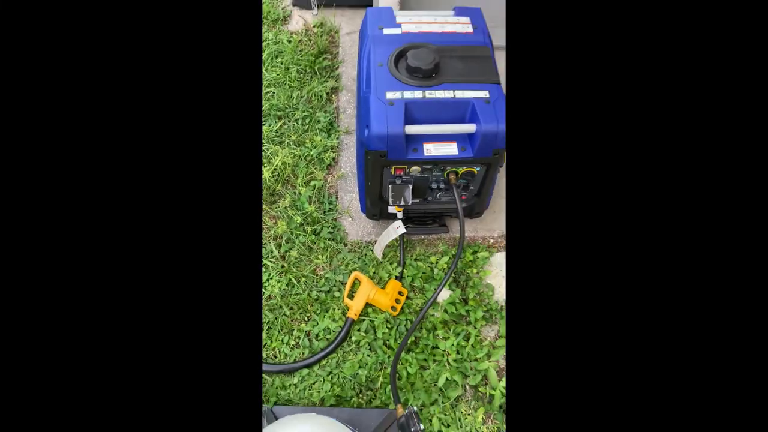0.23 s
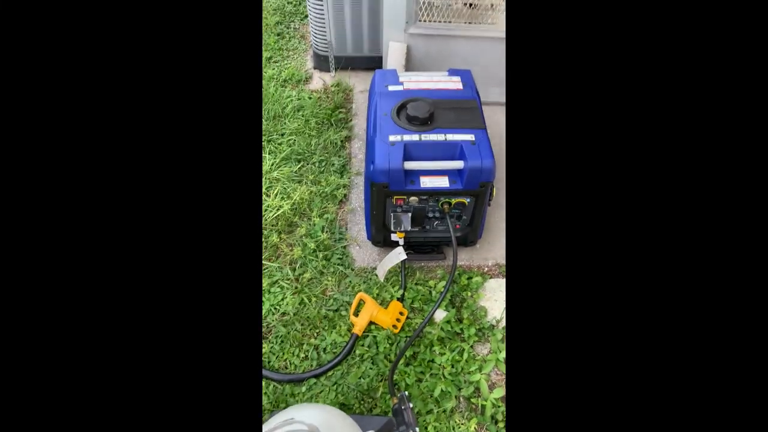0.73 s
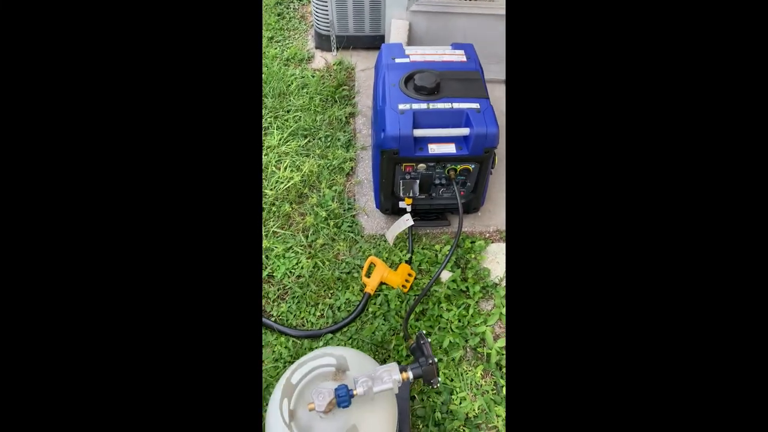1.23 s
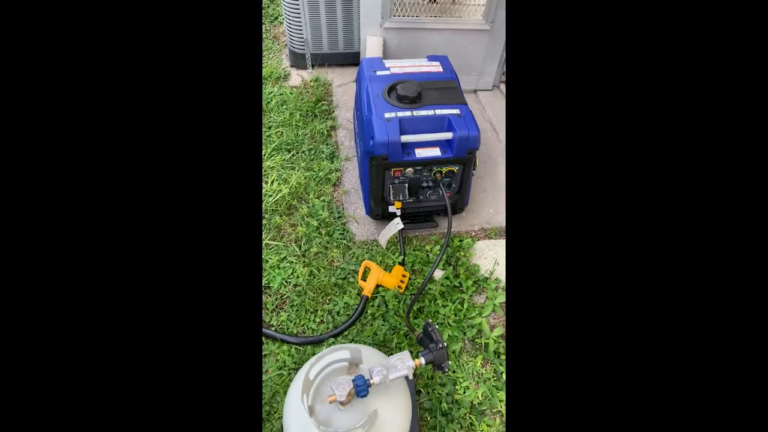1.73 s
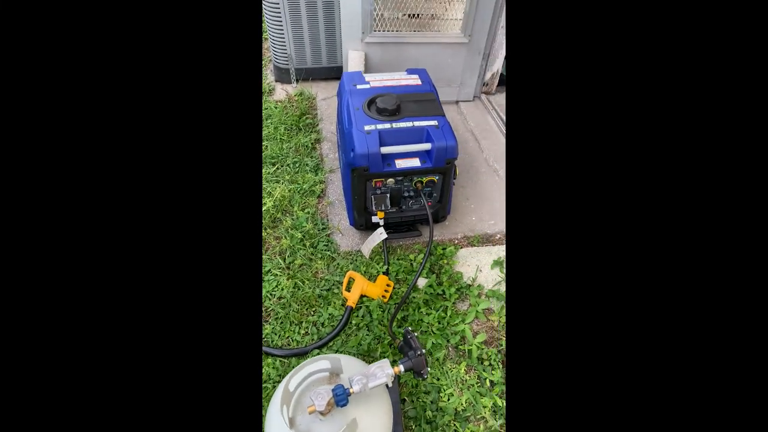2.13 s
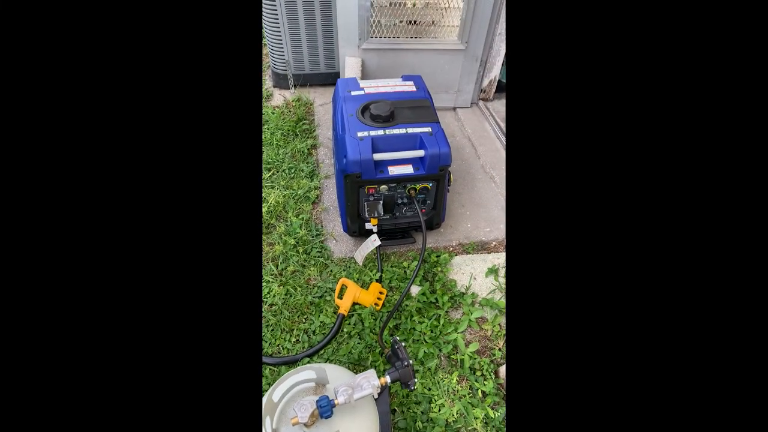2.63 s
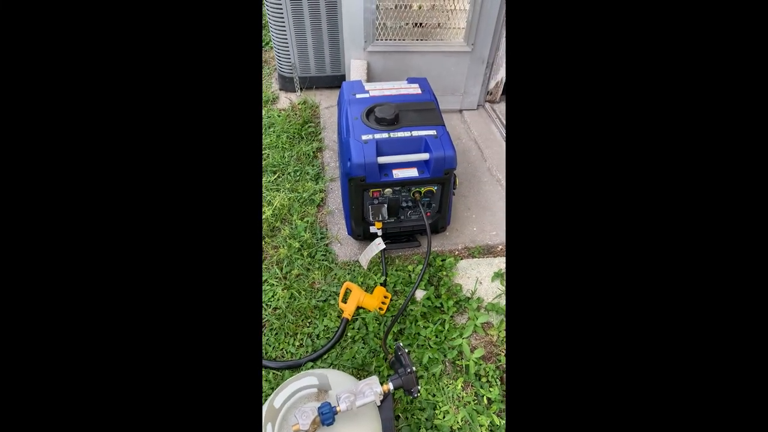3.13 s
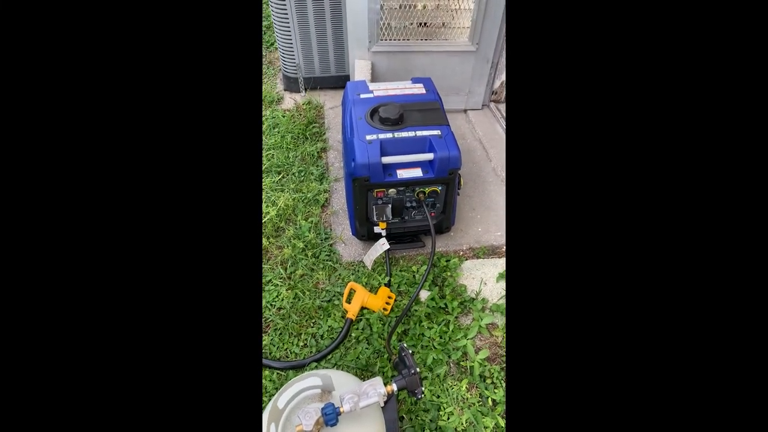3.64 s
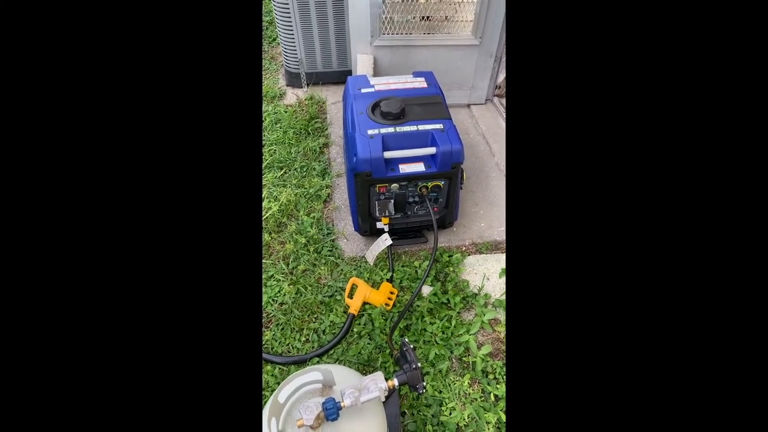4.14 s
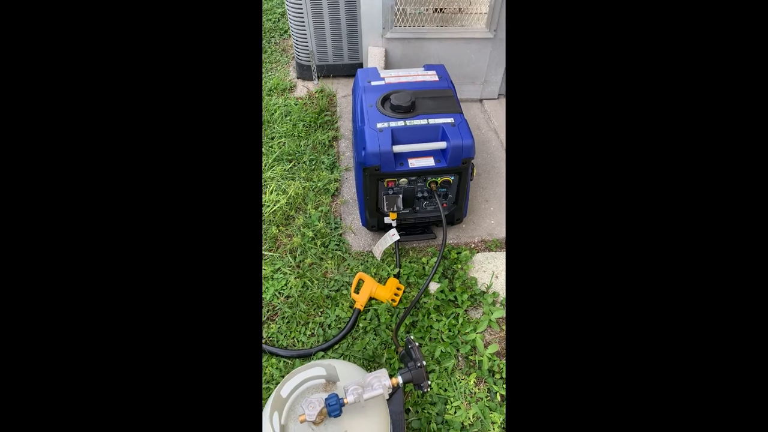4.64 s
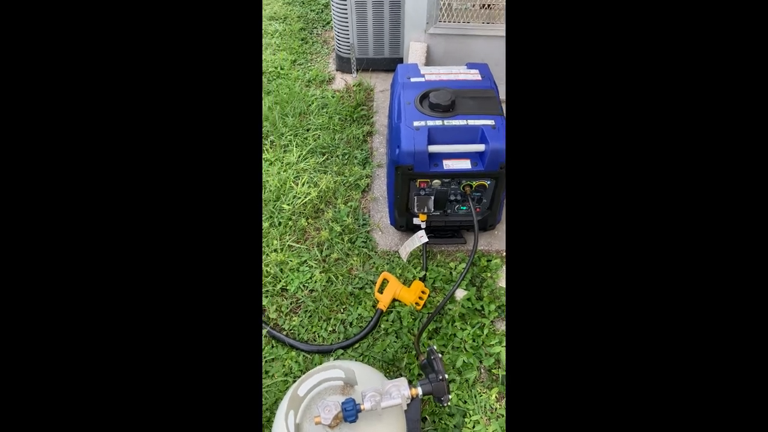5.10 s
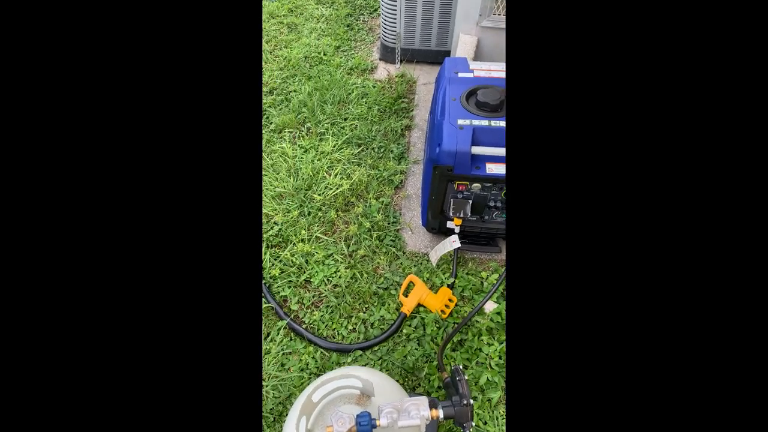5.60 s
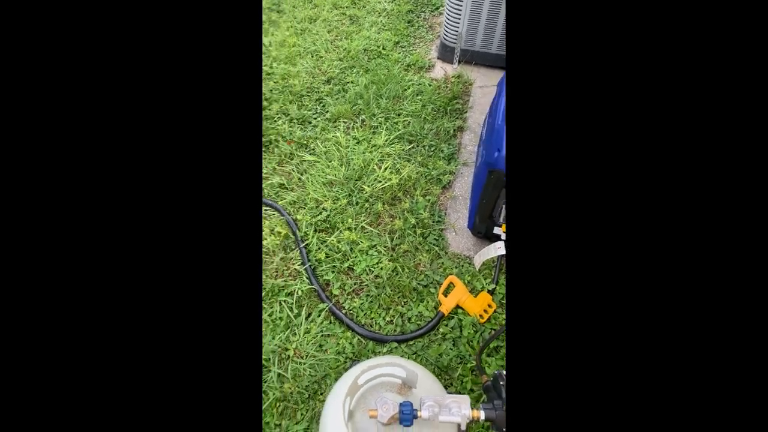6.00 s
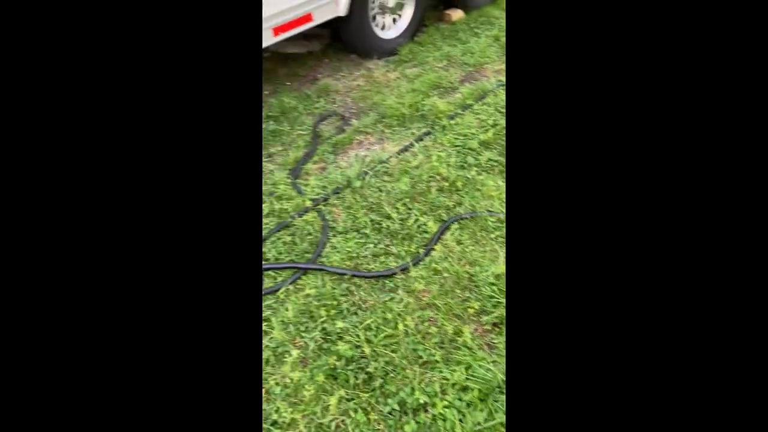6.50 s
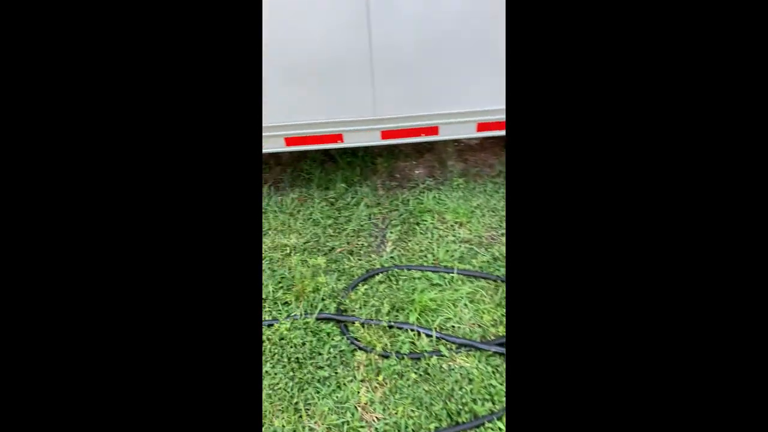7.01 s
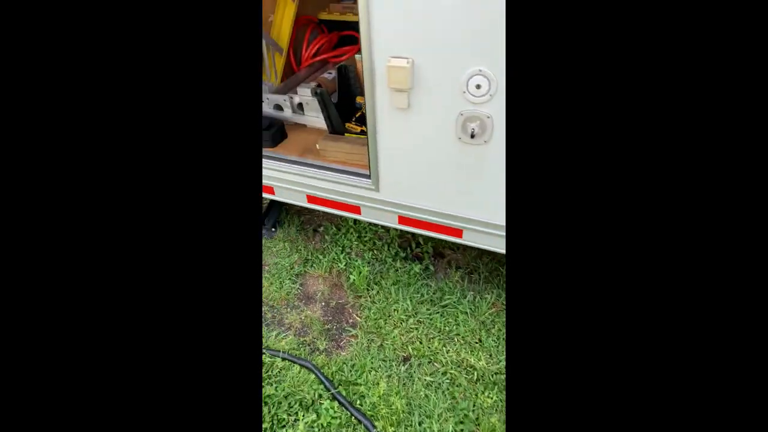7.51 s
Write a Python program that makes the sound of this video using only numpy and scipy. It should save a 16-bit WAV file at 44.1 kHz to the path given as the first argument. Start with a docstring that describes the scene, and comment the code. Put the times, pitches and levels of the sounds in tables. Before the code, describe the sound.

From 0 to 3.8 s, a small generator under two metres away is cranked by its electric starter outdoors: coarse, toothy grinding and a wavering whine near 1.9 kHz, with higher gear tones, pulsing about six times a second as each compression loads and slackens it. Low air gulps and a growl lie beneath; a soft wind puff touches the microphone at 1.2 s. At 3.8 s the starter releases with brief whistles. From 4.06 to 4.6 s dry coughs crowd together, ringing the casing as speed climbs. It races around 4.7 s, with a thin chirp near 4.1 kHz, then settles by 5.1 s to a thudding idle, about 22 pulses per second, with casing rattle, hiss and a bright knock about every second cycle. From 6.4 s the listener moves to its side and away, to about 4 m; it softens and loses treble. A faint grass brush comes at 7.2 s.

```python
"""Inverter generator, electric start to idle

Outdoors on a slab beside a lawn, a small generator under two metres from a two-port microphone, in light air.
The starter grinds (noise shaped by worn teeth) and whines (swaying tones) through one compression after another.
The single cylinder catches with short coughs (noise bursts ringing the casing), races, then settles to a thudding
idle: filtered gas pulses, casing taps, hiss, and a knock on each hard firing, about every second cycle.
Towards the end the listener steps round to its side and walks off, to about 4 m, and the sound grows softer."""
import sys
import numpy as np
from scipy import signal
from scipy.fft import rfft, irfft, next_fast_len
from scipy.io import wavfile
from scipy.ndimage import uniform_filter1d

SR = 44100
rng = np.random.default_rng(int(sys.argv[2]) if len(sys.argv) > 2 else 0)


def materialize(psi):
    """Save the field psi as 16-bit PCM at rate SR to the path in sys.argv[1].

    A 1-D psi becomes a single channel; in a 2-D psi each row is a channel.
    """
    bounded = np.clip(np.atleast_2d(psi).T, -1, 1)
    quanta = np.round(bounded * 32767).astype(np.int16)
    wavfile.write(sys.argv[1], SR, quanta)


N = 341775

# All levels are relative; in spectra only the shape counts wherever a sound is levelled afterwards.
# Light air on the microphone, and a low rumble under the engine: (frequency [Hz], level [dB])
BREEZE_SPECTRUM = [(10, -7), (22, -1), (35, 5), (60, 13), (120, 8), (400, -45)]
# the second is a low unsteady rumble under the engine, rising as the listener moves aside
BREEZE_DB, ASIDE_RUMBLE_DB = -44, -36
# A puff of wind on the microphone: (time [s], length [s], level [dB])
WIND_PUFF = (1.23, 0.04, -28)
# A shoe brushing the grass: (time [s], length [s], level [dB])
GRASS_SWISH = (7.17, 0.032, -39)

# Microphone ports: (frequency [Hz], lead of the left side [rad])
PORT_PHASE = [(10, 0), (1500, 0), (2500, .9), (3500, 1.4), (4900, 3.14), (6950, 6.28), (8800, 9.25),
              (9450, 9.6), (11200, 12.57), (12600, 15.5), (13650, 15.9), (15000, 18.8), (16500, 18.9)]
# Stereo width of the yard reflections: (frequency [Hz], level [dB])
REFLECTION_WIDTH = [(50, -19), (130, -13), (350, 0), (700, 1), (1400, 2), (2600, 4), (4500, -3),
                    (7000, -10)]
# Listener stepping round the machine: (time [s], distance [m], share of the way to its side)
LISTENER = [(5.5, 1.67, 0.037), (6.0, 1.63, 0.14), (6.45, 1.86, 0.5), (6.8, 2.77, 1), (7.15, 2.88, 0.83),
            (7.75, 4.1, 0.8)]
# Ground bounce: (distance [m], extra path [m])
GROUND_PATH = [(1.5, 0.466), (2.7, 0.455), (3.9, .32)]
# House wall bounce as the listener walks: (time [s], extra path [m])
WALL_PATH = [(6.1, 3.5), (6.65, 2.85), (7.0, 2.45), (7.4, 1.9), (7.75, 1.8)]
SOUND_M_PER_S, CUTOFF_HZ = 343, 15900
NEAR_M = 1.507  # distance at which the part levels hold
TREBLE_LOST = 0.83  # share of the treble lost when fully aside

# One cranking cycle: (share of the cycle, gear load [dB], speed change [%])
CRANK_CYCLE = [(0, -6, -1.5), (.04, -7, -2.0), (.11, -1, -1.7), (.17, -4, -1.0), (.27, .5, -.2),
               (.55, 0, .4), (.88, 1, .6), (1, -6, -1.5)]
# Starter motor: (time [s], grind level [dB], whine level [dB], gear mesh rate [Hz])
STARTER_COURSE = [(0, -35, -40.5, 1895), (.6, -37, -40.5, 1923), (1.15, -36.5, -44, 1936),
                  (1.65, -38, -36, 1919), (2.6, -37.5, -37.5, 1925), (3.3, -37, -36.5, 1900),
                  (3.78, -37, -34, 1875)]
# Gear tones: (multiple of the mesh rate, level [dB], random sway [Hz])
GEAR_TONES = [(1, -1, 12), (1.263, -5.5, 22), (1.812, -7.5, 55), (4.059, -4.5, 110)]
# Grinding teeth: (frequency [Hz], level [dB])
GRIND_SPECTRUM = [(250, -0.5), (600, 11.5), (1000, 5.5), (1500, 7), (2300, 6.5), (2900, 1), (3400, 5),
                  (4500, 4), (6200, 3.5), (7300, -2), (7800, 3.5), (9400, -1), (12000, -15.5),
                  (16000, -18.5)]
# Low rumble while cranking: (frequency [Hz], level [dB])
RUMBLE_SPECTRUM = [(12, -18), (30, -3), (65, -0.5), (88, -10.5), (125, 5.5), (170, -11), (220, 0),
                   (270, -8.5), (320, -4.5), (420, -14.5), (800, -18), (2000, -45.5)]
# Air drawn and pushed while cranking: (share of the cycle, length [share], pitch [Hz], width [Hz], level [dB])
GULPS = [(0.27, 0.16, 124, 6, -33.5), (0.53, 0.075, 160, 4.4, -39), (0.25, 0.057, 205, 25, -27.5)]
# Low growl that comes and goes: (time [s], level [dB])
GROWL_LEVEL = [(.05, 2), (.45, -8), (.75, -13), (.9, 1), (1.05, -7), (1.3, -4), (1.7, -5.5), (2.7, -2.5),
               (3.8, -2)]
GROWL_HZ, GROWL_DB, GROWL_WANDER_HZ, GROWL_SWAY_HZ = 612.7, -34, 20, 18
# Brief whistles and rings: (start [s], length [s], start pitch [Hz], end pitch [Hz], sway [Hz], level [dB])
WHISTLES = [(-.4, 1.74, 955, 985, 22, -42), (.17, .09, 3280, 3330, 60, -42),
            (3.772, .04, 3480, 3560, 50, -38), (3.86, .14, 2225, 2400, 3, -38.5),
            (3.94, .21, 2390, 2420, 6, -45), (3.92, .17, 258, 282, 4, -26), (4.15, .3, 395, 410, 30, -30),
            (4.12, .07, 585, 615, 4, -28)]
# While cranking, the piston passes compression at an even pace
FIRST_COMPRESSION_S, CRANK_PERIOD_S = .052, .163
PINION_TEETH = 27
PINION_WOBBLE = 0.37  # share by which the whine swells once per pinion turn
WHINE_FOLLOWS_LOAD = .9  # whine dB per dB of gear load
RELEASE_S = 3.767  # the engine outruns the starter, which fades
GRIND_FADE_DB_PER_S, WHINE_FADE_DB_PER_S = 33, 394

# Short coughs of gas as the engine catches: (time [s], peak level [dB], strongest frequency [Hz])
POPS = [(4.063, -12, 800), (4.110, -19, 850), (4.175, -17, 950), (4.205, -15, 900), (4.221, -7, 1150),
        (4.252, -15, 800), (4.283, -14, 600), (4.321, -11, 950), (4.354, -11, 1150), (4.393, -7, 1300),
        (4.422, -13, 800), (4.445, -13, 750), (4.478, -12, 1900), (4.529, -14, 800), (4.572, -17, 1500),
        (4.625, -15, 900)]
POP_RISE_S, POP_DECAY_S = .0007, .005
# Casing modes: (frequency [Hz], level [dB], time to fall 60 dB [s])
CASING_MODES = [(601, -3.5, 0.096), (719, -9, 0.076), (804, -4.5, 0.027), (1013, -3, 0.032),
                (1200, -3.5, 0.067), (1399.4, -7.5, 0.061), (1827, -9.5, 0.045), (2366, -17, 0.047),
                (3390, -11.5, 0.099)]

# Engine speed: (time [s], four-stroke cycles per second [1/s])
SPEED = [(3.8, 4.91), (4.0, 4.9), (4.15, 8.98), (4.35, 17.78), (4.5, 21.45), (4.62, 25.07), (4.73, 25.83),
         (4.89, 23.9), (5.05, 22.05), (5.35, 22.01), (5.65, 21.23), (6.0, 22.11), (6.3, 21.35), (6.6, 21.8),
         (7.15, 21.33), (7.4, 21.9), (7.6, 21.45), (7.75, 21.35)]
# Governor opens up, shuts on the overshoot and settles:
# (time [s], throttle: higher is more open, about -0.4 at the settled idle, below -1 shut)
THROTTLE = [(4.03, 0.44), (4.2, 0.9), (4.39, 0.72), (4.6, 0.28), (4.72, -1.34), (4.9, -1.35), (5.03, -0.46),
            (5.3, -0.36)]
FIRST_FIRING_S, IDLE_PER_S = 3.8696, 21.7
# Runs of hard firings counted from the first firing: (first cycle, last cycle, step [cycles], level [dB])
HARD_RUNS = [(0, 2, 2, 0), (3, 10, 1, .5), (11, 12, 1, -6), (20, 23, 3, 0), (25, 53, 2, 0), (56, 78, 2, -1)]
# Intake pulse after the exhaust pulse: (throttle, level against it [dB], delay [share of the cycle])
INTAKE = [(-1, -9, .41), (-.4, -6, .385), (0, -6, .385), (.4, 3, .345)]
EXHAUST_SHARE = .365  # share of the cycle at which the exhaust valve opens
# Loudness of exhaust thud, case panels, valve clatter, gas rush and knock, in that order:
# (level at idle speed and throttle 0 [dB], per doubling of speed [dB], per unit of throttle above 0 [dB],
# per unit below 0 [dB], more from the side [dB])
PART_LEVELS = [(-12.5, 7, 2, -2.5, -4), (-29.5, 4, 5.5, -3.5, 10), (-30, 2.5, 8.5, 2.5, -0.5),
               (-38.5, 5, 10.5, 3, 3.5), (-20, 3, 5, 1.5, -1)]
# Exhaust boom: (frequency [Hz], level [dB])
MUFFLER_SPECTRUM = [(12, -32), (22, -21), (43, -22), (66, -10), (87, -1.5), (112, -3.5), (130, -6),
                    (150, -8), (174, 0), (195, -4), (217, -7.5), (242, -21), (400, -36), (900, -55)]
# Exhaust note heard from the side: (frequency [Hz], level change [dB])
SIDE_COLOUR = [(65, 14), (108, -3), (130, 8.5), (152, -7), (190, 5), (217, 3), (240, 6), (300, 0.5)]
# Machine kicking on its feet: (frequency [Hz], level [dB])
MOUNTS_SPECTRUM = [(12, -27), (35, -23), (58, 11.5), (85, 9), (120, -1), (150, 4.5), (220, -8), (900, -62)]
# Case panels: (frequency [Hz], level [dB])
PANELS_SPECTRUM = [(150, -37), (235, -4), (280, 1.5), (301, 5), (323, 2), (345, 2.5), (366, 3.5), (395, -2),
                   (425, -4), (480, -6), (560, -12), (800, -35)]
# Valve clatter: (frequency [Hz], level [dB])
CLATTER_SPECTRUM = [(300, -12), (480, 3), (600, 7.5), (800, 4), (1050, 3), (1220, 2.5), (1400, 1),
                    (1600, -9), (1900, -29), (2700, -23), (5000, -32)]
# Cooling air and gas rush: (frequency [Hz], level [dB])
HISS_SPECTRUM = [(900, 7), (1900, 6), (2800, 3), (3400, 1), (4400, 3.5), (5900, -1), (8400, -2),
                 (11000, -7), (16000, -12)]
# Combustion knock, also used for the brushed grass: (frequency [Hz], level [dB])
KNOCK_SPECTRUM = [(800, 10.5), (1500, 1), (2600, -4.5), (4400, -3), (5900, 5), (7300, -4.5), (8500, 4),
                  (11000, -5), (16000, -9.5)]
# Piston and valve taps on the casing: (share of the cycle, level [dB])
TAPS = [(.06, -4), (.29, 0), (.43, -3.5), (.66, -2.5), (.8, -4)]
# Air chirping past the closing throttle: (time [s], pitch [Hz], level [dB])
CHIRP = [(4.62, 3400, -42), (4.66, 3420, -34), (4.69, 3450, -38), (4.72, 4050, -31), (4.77, 4100, -27.5),
         (4.85, 4100, -27.5), (4.95, 4050, -46)]
SHAKE_DB, SHAKE_OPEN_DB = -30, 6
KICK_SPREAD_DB, RATTLE_SPREAD_DB = 1.0, 2.2
PANEL_NOISE, CLATTER_NOISE, TAP_SHARE = .75, .85, 1.0  # strength against the pulses


def from_db(db):
    """Decibels to gain."""
    return 10 ** (np.asarray(db) / 20)


def rms_one(x):
    """Scale to rms 1."""
    return x / np.sqrt(np.mean(x ** 2) + 1e-20)


def seconds():
    """The time of every sample."""
    return np.arange(N) / SR


def read(rows, at):
    """The columns of a table, joined by straight lines."""
    key, *columns = np.transpose(rows)
    return [np.interp(at, key, c) for c in columns]


def gain_at(points, hz):
    """Gain of a spectrum at any frequency, joined in dB over log frequency."""
    f, db = np.transpose(points)
    return from_db(np.interp(np.log(hz + 1e-3), np.log(f), db))


def colour(x, points):
    """Causal (minimum-phase) filter with the given spectrum."""
    size = 2 * next_fast_len(N // 2 + SR // 4)
    hz = np.arange(size // 2 + 1) * SR / size
    cepstrum = irfft(np.log(gain_at(points, hz)))
    # fold the cepstrum onto positive time
    cepstrum[1:size // 2] *= 2
    cepstrum[size // 2 + 1:] = 0
    return irfft(rfft(x, size) * np.exp(rfft(cepstrum)))[:N]


def noise(points):
    """Coloured noise of rms 1."""
    return rms_one(colour(rng.standard_normal(N), points))


def drift(rate):
    """Random wander of rms 1 with the given number of knots per second."""
    knots = rng.standard_normal(N // 10)
    return rms_one(np.interp(seconds() * rate, np.arange(len(knots)), knots))


def tone(hz, sway_hz):
    """A sine of rms 1 whose pitch sways at random."""
    swaying_hz = hz + sway_hz * drift(4 * abs(sway_hz) + 20)
    return np.sqrt(2) * np.sin(2 * np.pi * np.cumsum(swaying_hz) / SR)


def even(x):
    """Hold the level near 1 over a few engine cycles."""
    power = uniform_filter1d(uniform_filter1d(x ** 2, size=4064), size=4064)
    return x / np.sqrt(np.abs(power) + 1e-3 * np.mean(x ** 2))


def bump(s, length_s, db):
    """A single smooth rise and fall of level."""
    return from_db(db) * np.exp(-.5 * ((seconds() - s) / length_s) ** 2)


def swell(cycle, centre, length):
    """A smooth bump once in every cycle."""
    return np.exp(-.5 * (((cycle - centre + .5) % 1 - .5) / length) ** 2)


def bursts(rows, rise_s, decay_s):
    """Envelope of blows that swell quickly and die away."""
    out, age = np.zeros(N + SR), np.arange(SR // 4) / SR
    blow = (1 - np.exp(-age / rise_s)) * np.exp(-age / decay_s)
    for s, db in rows:
        at = int(s * SR)
        out[at:at + len(age)] += from_db(db) * blow
    return out[:N]


def strokes(cycle, share, spread_db):
    """A click each time the cycle passes the given share, at a strength that varies at random."""
    clicks = np.diff(np.floor(cycle - share), prepend=np.floor(cycle[0] - share))
    return clicks * from_db(spread_db * rng.standard_normal(N))


def diffuse(x, t60):
    """A dense, dying response: many panel modes, or many small reflections."""
    age = np.arange(SR // 3) / SR
    response = rng.standard_normal(len(age)) * from_db(-60 * age / t60)
    return signal.oaconvolve(x, response / np.linalg.norm(response))[:N]


def shifting(x, t60):
    """Two blends of panel modes trade places slowly, so the tone keeps shifting."""
    angle = 2.477 * seconds() + 0.79 * drift(1.952)
    return np.cos(angle) * diffuse(x, t60) + np.sin(angle) * diffuse(x, t60)


def ring(clicks, hz, t60):
    """A unit click sets a decaying sine of height 1 ringing in a two-pole resonator."""
    r, w = from_db(-60 / (t60 * SR)), 2 * np.pi * hz / SR
    return signal.lfilter([0, np.sin(w)], [1, -2 * r * np.cos(w), r * r], clicks + 1e-18)


def low_air():
    """Light air with one puff, and a low unsteady rumble under the engine, rising as the listener moves aside."""
    aside = read(LISTENER, seconds())[1]
    level = from_db(BREEZE_DB) + from_db(ASIDE_RUMBLE_DB) * aside + bump(*WIND_PUFF)
    return level * noise(BREEZE_SPECTRUM)


def grass_swish():
    """A shoe brushes the grass: one short swell of bright noise."""
    return bump(*GRASS_SWISH) * noise(KNOCK_SPECTRUM)


def yard(x, echo_db, t60, blur_db=-11):
    """Slab and wall scatter a little sound back; two close microphone ports hear the treble out of step."""
    size = next_fast_len(N + SR // 4)
    hz = np.arange(size // 2 + 1) * SR / size
    half = read(PORT_PHASE, hz)[0] / 2
    direct = rfft(x, size)
    near, wide, stray_mid, stray_side = (rfft(diffuse(x, t60), size) for _ in range(4))
    # sound from other directions tells most where the ports are neither in step nor opposed
    blur = from_db(blur_db) * np.abs(np.sin(2 * half))
    mid_echo = from_db(echo_db) * near * np.minimum(1, hz / 700)
    side_echo = from_db(echo_db) * wide * gain_at(REFLECTION_WIDTH, hz)
    mid = np.cos(half) * (direct + mid_echo) + blur * stray_mid
    side = 1j * np.sin(half) * direct + side_echo + blur * stray_side
    mid, side = irfft(mid, size)[:N], irfft(side, size)[:N]
    return np.array([mid + side, mid - side])


def bounce(x, extra_m, share):
    """A delayed reflection whose comb peaks rise in pitch as its extra path shortens."""
    t = seconds()
    reflected = np.interp(t - extra_m / SOUND_M_PER_S, t, x)
    return (x + share * reflected) / np.hypot(1, share)


def turned_away(x, edge_hz=7500):
    """The top of the treble is shaded once the generator is off to the side."""
    treble = signal.sosfilt(signal.butter(1, edge_hz, "high", fs=SR, output="sos"), x)
    aside = read(LISTENER, seconds())[1]
    return x - np.clip(TREBLE_LOST * aside, 0, 1) * treble


def whistles():
    """Brief gliding tones swell and fade, mostly as the starter takes up and lets go."""
    out = 0
    for start, length, start_hz, end_hz, sway_hz, db in WHISTLES:
        along = np.clip((seconds() - start) / length, 0, 1)
        glide_hz = start_hz + (end_hz - start_hz) * along
        out = out + from_db(db) * np.sin(np.pi * along) * tone(glide_hz, sway_hz)
    return out


def worn_teeth(turns):
    """The same rough tooth faces come round on every turn of the pinion."""
    faces = rng.standard_normal(600)
    return rms_one(np.interp(turns % 1 * len(faces), np.arange(len(faces)), faces))


def gear_grind(turns, bite, load_db, grind_db):
    """Rough teeth and noise scrape; the treble follows the load far more than the bass."""
    grind = rms_one(colour(.5 * worn_teeth(turns) + rng.standard_normal(N), GRIND_SPECTRUM))
    treble = signal.sosfilt(signal.butter(1, 1800, "high", fs=SR, output="sos"), grind)
    bass = grind - treble
    return from_db(grind_db + 8.0) * (treble * bite * from_db(load_db) + bass * from_db(0.011 * load_db))


def gear_whine(mesh_hz, pinion, load_db, whine_db):
    """Tones at multiples of the mesh rate swell with the load and once per pinion turn."""
    tones = sum(from_db(db) * tone(k * mesh_hz, sway_hz) for k, db, sway_hz in GEAR_TONES)
    level_db = whine_db + WHINE_FOLLOWS_LOAD * load_db + 3.4 * drift(60) + 0.54 * drift(8.53)
    return tones * from_db(level_db) * (1 + PINION_WOBBLE * np.cos(pinion))


def cranking_air(cycle):
    """The piston draws and pushes air: low tones swell once per compression."""
    out = 0
    for at, length, hz, width_hz, db in GULPS:
        out = out + from_db(db + 1.3 * drift(9.7)) * swell(cycle, at, length) * tone(hz, width_hz)
    return out


def starter_growl(cycle):
    """A low, wandering tone swells just after each compression."""
    level = from_db(GROWL_DB + read(GROWL_LEVEL, seconds())[0]) * (0.4 + swell(cycle, 0.12, 0.13))
    return level * tone(GROWL_HZ + GROWL_WANDER_HZ * drift(6.1), GROWL_SWAY_HZ)


def starter(chatter_db=-0.5, grit_db=3.0):
    """The gears grind and whine under load, slow down at each compression and go slack just after it."""
    t = seconds()
    cycle = (t - FIRST_COMPRESSION_S) / CRANK_PERIOD_S
    load_db, speed_percent = read(CRANK_CYCLE, cycle % 1)
    grind_db, whine_db, mesh_hz = read(STARTER_COURSE, t)
    mesh_hz = mesh_hz * (1 + speed_percent / 100)
    turns = np.cumsum(mesh_hz / PINION_TEETH) / SR + .03 * drift(40)
    pinion = 2 * np.pi * turns
    # the bite varies once per pinion turn, and at random
    bite = from_db(chatter_db * np.cos(pinion) + grit_db * drift(350))
    cranking = gear_grind(turns, bite, load_db, grind_db) + cranking_air(cycle) + starter_growl(cycle)
    cranking = cranking + from_db(-28.5) * noise(RUMBLE_SPECTRUM)
    whine = gear_whine(mesh_hz, pinion, load_db, whine_db)
    released_s = np.maximum(0, t - RELEASE_S)
    return from_db(-GRIND_FADE_DB_PER_S * released_s) * cranking + from_db(-WHINE_FADE_DB_PER_S * released_s) * whine


def pops(ring_db=-35):
    """Short coughs of gas, sometimes several in one cycle, set the casing ringing as the engine catches."""
    out, age = np.zeros(N), np.arange(SR // 8) / SR
    envelope = (1 - np.exp(-age / POP_RISE_S)) * np.exp(-age / POP_DECAY_S)
    for s, peak_db, hz in POPS:
        cough = rng.standard_normal(len(age)) * envelope
        body = sum((-1) ** k * from_db(db) * ring(cough, mode_hz, t60)
                   for k, (mode_hz, db, t60) in enumerate(CASING_MODES))
        band = signal.butter(2, [hz / 1.6, hz * 1.6], "band", fs=SR, output="sos")
        pop = signal.sosfilt(band, cough + from_db(ring_db) * body)
        out[int(s * SR):][:len(age)] += from_db(peak_db) * pop / np.abs(pop).max()
    return out


def engine_cycle(per_s):
    """Count four-stroke cycles from the first firing; also list the hard firings as (time [s], level [dB])."""
    t, cycle = seconds(), np.cumsum(per_s) / SR
    cycle = cycle - np.interp(FIRST_FIRING_S, t, cycle)
    firings = []
    for first, last, step, db in HARD_RUNS:
        firings += [(np.interp(k, cycle, t), db) for k in range(first, last + 1, step)]
    return cycle, firings


def part_gains(per_s, throttle):
    """Each part's loudness follows speed and throttle, and where the listener stands."""
    distance_m, aside = read(LISTENER, seconds())
    doublings = np.log2(per_s / IDLE_PER_S)
    above, below = np.maximum(throttle, 0), np.maximum(-throttle, 0)
    gains = []
    for base_db, speed_db, above_db, below_db, side_db in PART_LEVELS:
        level_db = base_db + speed_db * doublings + above_db * above + below_db * below + side_db * aside
        gains.append(from_db(level_db) * NEAR_M / distance_m)
    return gains


def throttle_chirp(cycle):
    """Air chirps past the closing throttle on each intake: a swaying tone gated by the cycle."""
    t = seconds()
    chirp_hz, chirp_db = read(CHIRP, t)
    active = (t > CHIRP[0][0]) * (t < CHIRP[-1][0])
    return from_db(chirp_db) * active * swell(cycle, .82, .07) * tone(chirp_hz, 130)


def gas_rush(cycle):
    """Cooling air and gas hiss: unsteady noise that swells once per cycle."""
    return from_db(2.4 * drift(150)) * noise(HISS_SPECTRUM) * (1.05 + 0.33 * swell(cycle, 0.12, 0.46))


def casing(clicks, spread_db):
    """Every tap strikes each mode of the casing with a strength of its own."""
    out = 0
    for k, (hz, db, t60) in enumerate(CASING_MODES):
        struck = clicks * from_db(db + spread_db * rng.standard_normal(N))
        out = out + (-1) ** k * ring(struck, hz, t60)
    return out


def valve_clatter(cycle, per_s, throttle, pulses, hard, ragged_db=0.9):
    """Valves and gas rush rattle the case in step with the pulses, more unevenly far from throttle 0."""
    rattle = (1 + .9 * swell(cycle, .36, .12) + .5 * hard) * from_db(RATTLE_SPREAD_DB * drift(110))
    taps = sum(from_db(db) * strokes(cycle, at, spread_db=1) for at, db in TAPS) * (1 + .5 * hard)
    clatter = even(colour(shifting(pulses, t60=0.4), CLATTER_SPECTRUM))
    clatter = clatter + CLATTER_NOISE * even(rattle * noise(CLATTER_SPECTRUM))
    tapping = TAP_SHARE * np.minimum(per_s / IDLE_PER_S, 1) ** 2 * even(casing(taps, spread_db=5))
    distance_m = read(LISTENER, seconds())[0]
    clatter = bounce(clatter + tapping, read(GROUND_PATH, distance_m)[0], share=.3)
    return even(clatter * from_db(ragged_db * throttle * drift(130)))


def case_panels(pulses, panel_gain):
    """The gas pulses shake the case panels, whose noise also bounces off the house wall."""
    shaken = pulses + .5 * shifting(pulses, t60=0.27)
    panels = even(colour(shaken, PANELS_SPECTRUM)) + PANEL_NOISE * noise(PANELS_SPECTRUM)
    return bounce(panel_gain * even(panels), read(WALL_PATH, seconds())[0], share=.3)


def exhaust(cycle, per_s, throttle, hard, kick_db=-14):
    """Exhaust and intake pulses boom through the muffler; returns the bare pulses and their boom."""
    intake_db, intake_after = read(INTAKE, throttle)
    pulses = strokes(cycle, EXHAUST_SHARE, spread_db=.4) * (1 + .3 * hard)
    pulses = pulses + strokes(cycle - intake_after, EXHAUST_SHARE, spread_db=.5) * from_db(intake_db)
    # puffs of gas have soft edges
    pulses = signal.sosfilt(signal.butter(2, 3500, fs=SR, output="sos"), pulses)
    # the gas flow is ragged until the engine is up to speed
    turbulence = from_db(np.interp(per_s, [9, 17, 21], [6, -10, -21]))
    # a hard firing also kicks the whole machine on its feet
    kicks = rms_one(colour(strokes(cycle, .16, spread_db=KICK_SPREAD_DB) * hard, MOUNTS_SPECTRUM))
    boom = even(colour(pulses, MUFFLER_SPECTRUM))
    boom = even(boom + from_db(kick_db) * kicks + turbulence * noise(MUFFLER_SPECTRUM))
    aside = read(LISTENER, seconds())[1]
    return pulses, (1 - aside) * boom + aside * colour(boom, SIDE_COLOUR)


def engine():
    """The gas pulses thud and shake the case, valves tap the casing; hard firings add a bright knock."""
    t = seconds()
    per_s, throttle = read(SPEED, t)[0], read(THROTTLE, t)[0]
    thud_gain, panel_gain, clatter_gain, rush_gain, knock_gain = part_gains(per_s, throttle)
    cycle, firings = engine_cycle(per_s)
    # no two cycles take quite the same time
    cycle = cycle + .003 * drift(20)
    hard = bursts(firings, rise_s=0.0026, decay_s=0.016)
    pulses, boom = exhaust(cycle, per_s, throttle, hard)
    # the machine shakes once per crankshaft turn, twice per cycle
    shake_gain = from_db(SHAKE_DB + SHAKE_OPEN_DB * np.maximum(throttle, 0)) * per_s / IDLE_PER_S
    running = thud_gain * boom + shake_gain * tone(2 * per_s, 0) + case_panels(pulses, panel_gain)
    running = running + clatter_gain * valve_clatter(cycle, per_s, throttle, pulses, hard)
    running = running + rush_gain * gas_rush(cycle) + throttle_chirp(cycle)
    knock = knock_gain * noise(KNOCK_SPECTRUM) * bursts(firings, rise_s=0.00052, decay_s=0.016)
    return np.interp(t, [3.78, 3.83], [0, 1]) * running + knock


def scene():
    """Starter, first pops and running engine, outdoors in light air; the listener walks off over the grass."""
    generator = turned_away(starter() + whistles() + pops() + engine())
    return yard(generator + grass_swish(), echo_db=-12, t60=.2) + low_air()


def record(dry):
    """The deepest bass is dropped, peaks are clipped under full scale, the top is cut."""
    x = signal.sosfilt(signal.butter(1, 8, "high", fs=SR, output="sos"), dry)
    top_cut = signal.ellip(10, .2, 80, CUTOFF_HZ, fs=SR, output="sos")
    return signal.sosfilt(top_cut, np.clip(x, -.97, .97))


dry = scene()
out = record(dry)
materialize(out)
```